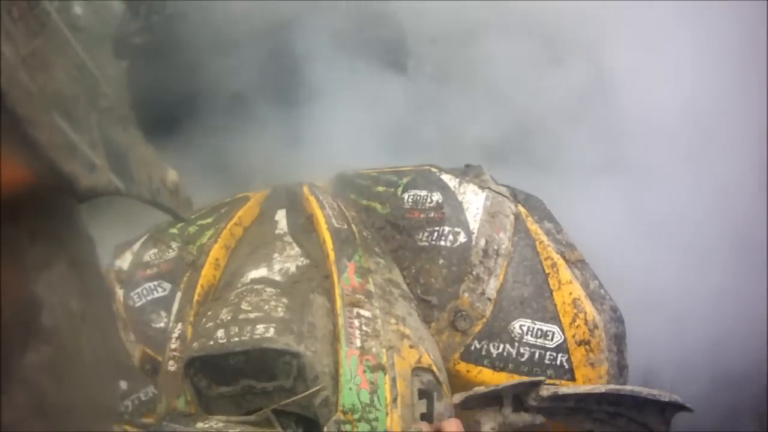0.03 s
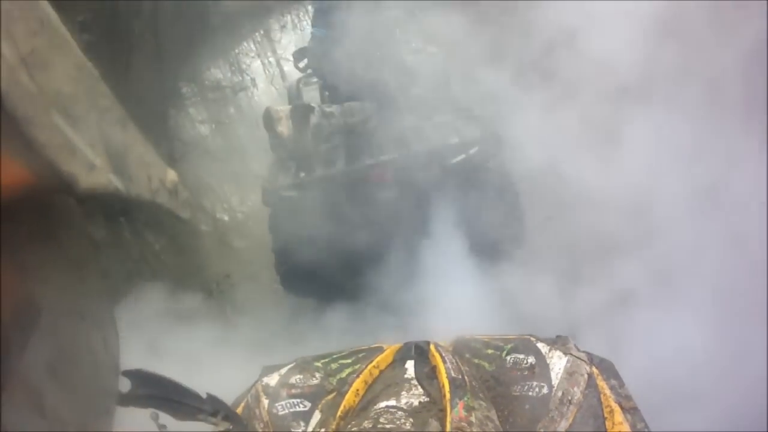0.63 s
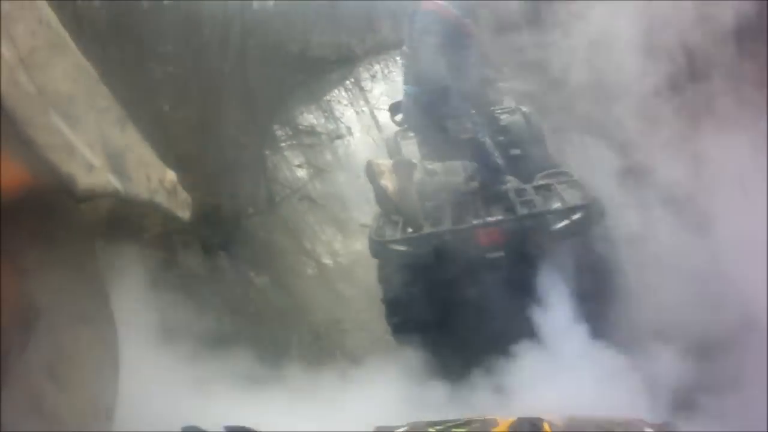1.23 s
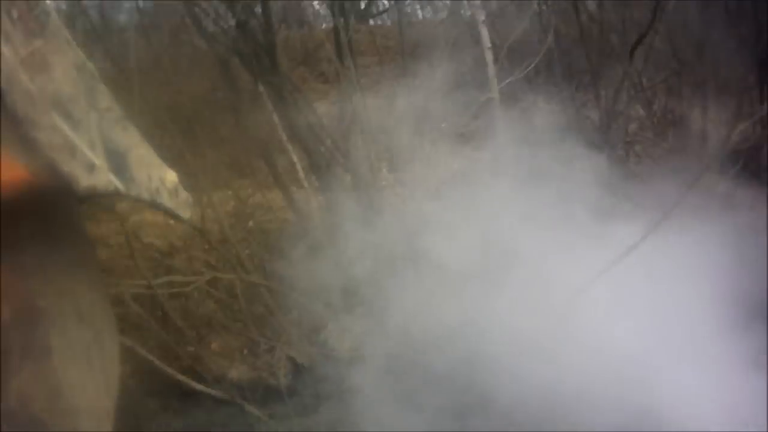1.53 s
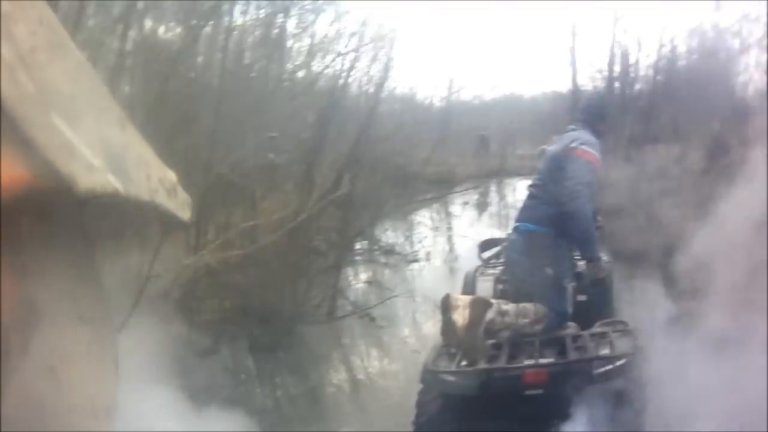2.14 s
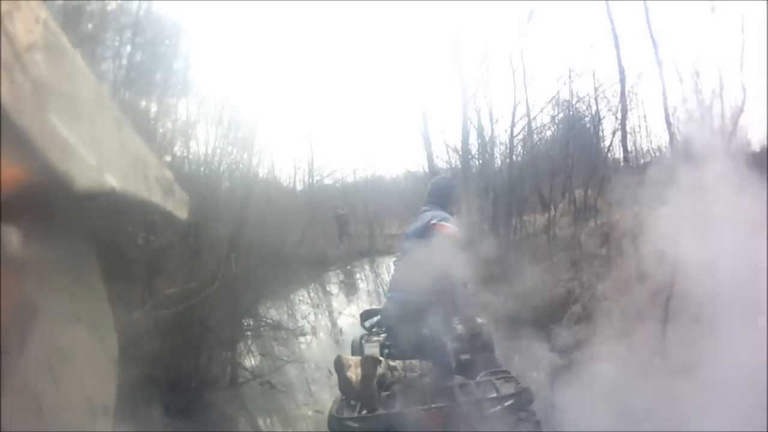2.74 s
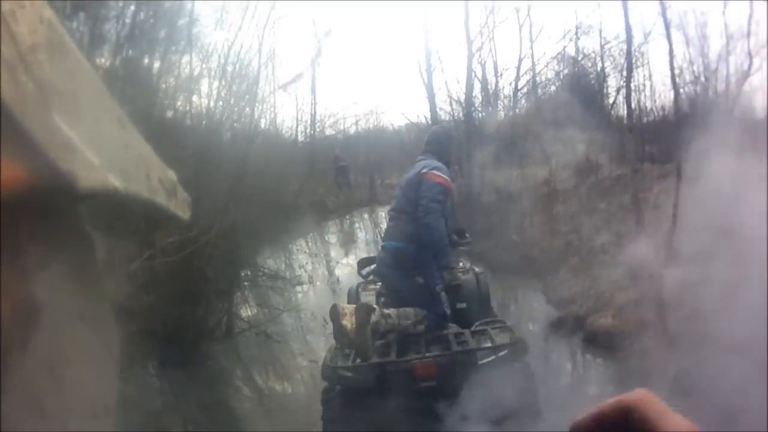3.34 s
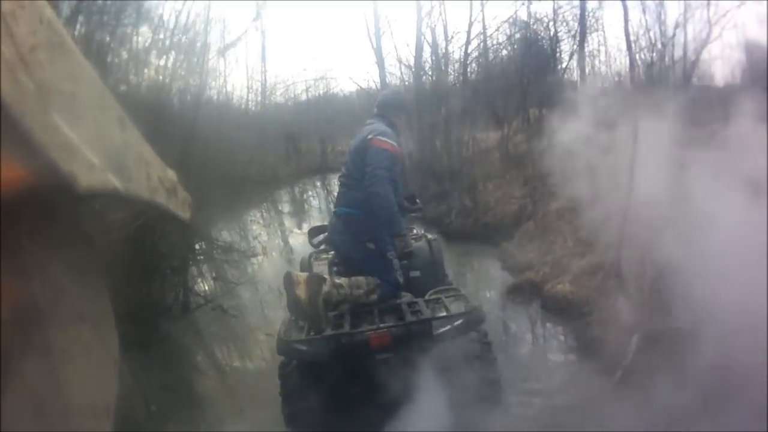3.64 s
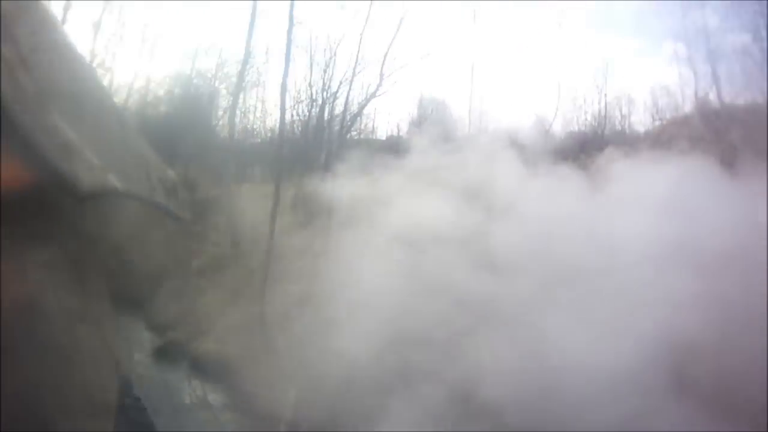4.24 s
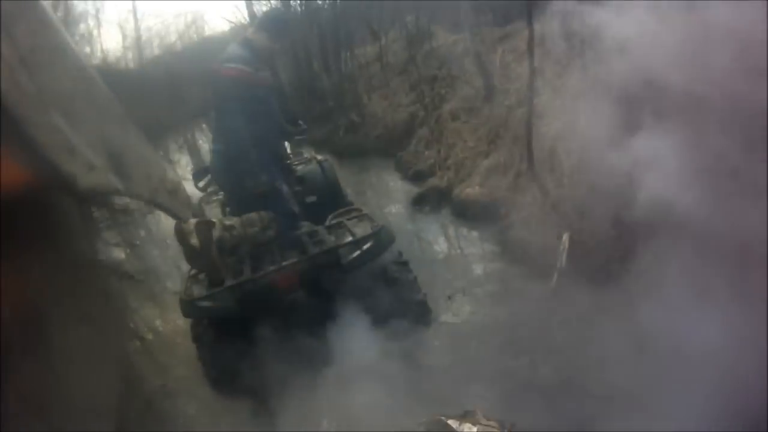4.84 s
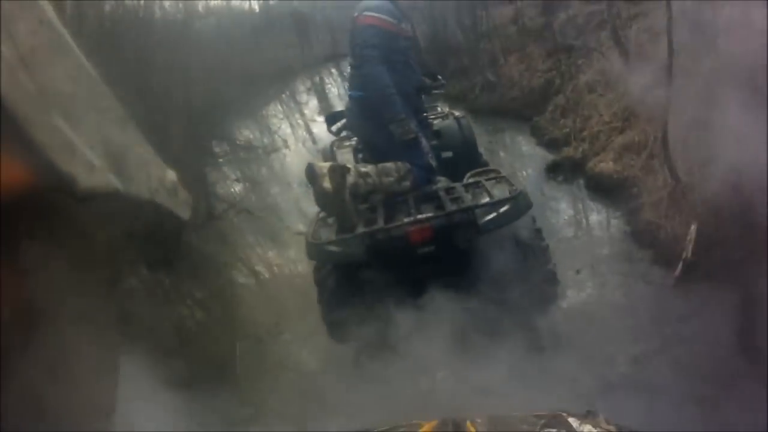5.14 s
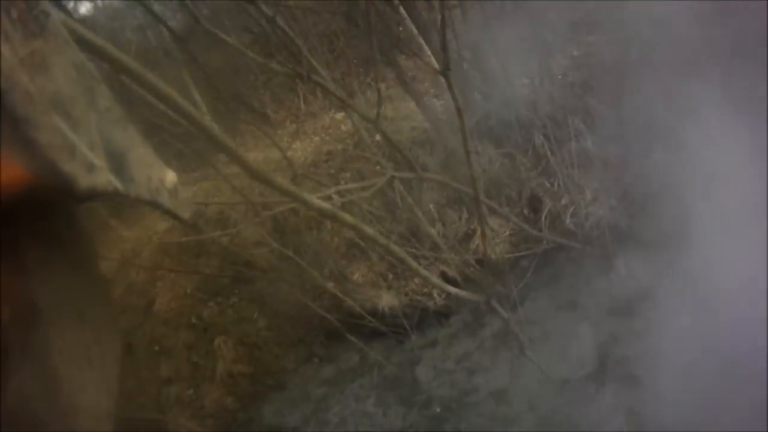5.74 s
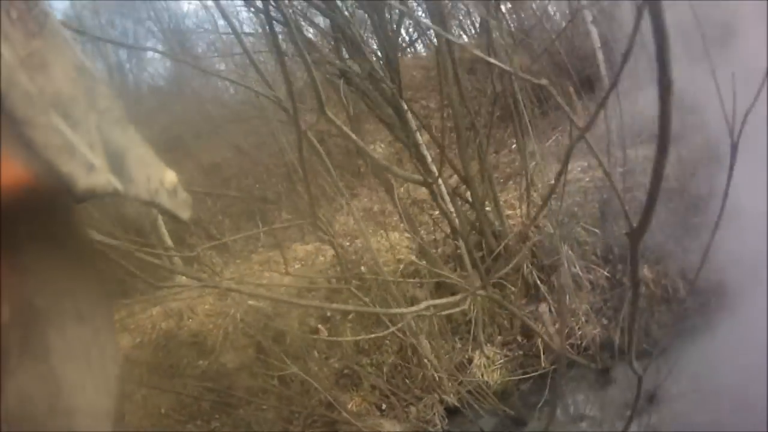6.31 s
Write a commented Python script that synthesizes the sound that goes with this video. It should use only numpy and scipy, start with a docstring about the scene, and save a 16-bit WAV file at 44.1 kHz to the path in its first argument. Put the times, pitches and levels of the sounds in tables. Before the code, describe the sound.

Outdoors in a muddy creek, water churns and sprays under the wheels while a quad bike's exhaust barks close in front. The engine breaks into harsh, choppy bursts at top revs, then the throttle shuts and the pitch sinks with backfires, hissing puffs and brief revs, down to a gentle putter. Underneath are the low hum of a second quad and occasional bumps on the microphone, which the loudest pops overload.

```python
"""Riding a quad bike through a muddy creek, close behind another, its tailpipe aimed at the microphone.
Wheels churn the water as the engine ahead barks under throttle, then stutters against the rev limiter.
From 1.3 s jolts thump the camera and the nearer quad's hum swells. After 2.3 s the engine ahead
backfires and coasts down, each turn puffing, hissing and ringing the pipe, between short throttle
blips and more backfires, to soft idle putts at 6 s. The loudest bangs overload the microphone."""
import sys
import numpy as np
from scipy import signal
from scipy.io import wavfile

SR = 44100
rng = np.random.default_rng(int(sys.argv[2]) if len(sys.argv) > 2 else 0)


def unload_audio(sound):
    """Save the sound as a 16-bit wav file, at the path given as the first command line argument."""
    columns = np.transpose(np.atleast_2d(sound))
    # keep every value between -1 and 1, then stretch to whole-number steps
    steps = np.round(np.clip(columns, -1, 1) * 32767)
    wavfile.write(sys.argv[1], SR, steps.astype(np.int16))


N = 280901
TIME = np.arange(N) / SR
LIMIT_RPS = 63  # crank speed at the rev limiter

# crank of the quad ahead, one exhaust puff a turn: t/s, speed/rps
CRANK_SPEED = [(0, 49.51), (.26, 51), (.524, 63.24), (.66, 64.9), (.88, 62.1), (1.15, 63.25),
               (2.346, 63.28), (2.737, 62), (2.946, 54.7), (3.116, 48.5), (3.501, 45), (3.679, 39.02),
               (3.97, 46.7), (4.03, 53.9), (4.08, 45.6), (4.463, 40.5), (4.754, 33.52), (5.136, 42.97),
               (5.389, 40), (5.78, 34.3), (5.82, 36.9), (6.37, 29.8)]
# every turn fires, barking under throttle or putting softly at idle:
# start/s, end/s, first level/dB, last level/dB, relative pipe boom/dB
FIRING_RUNS = [(0.005, 0.286, -20, -14, 1.5), (.28, 0.577, -14, -13.5, 0.5), (.888, 1.098, -8, -9, -5),
               (1.11, 1.205, -8.5, -10, -5), (2.555, 2.668, -18.5, -10, -11.5), (3.797, 4.02, -19, -8, -7),
               (4.805, 4.909, -26.5, -9, -8.5), (4.908, 4.96, -8, -13, -9.5), (4.99, 5.135, -8, -8.5, -9),
               (5.812, 5.885, -22.5, -9, -11), (5.984, 6.262, -27, -26, -12)]
# on the rev limiter: start/s, end/s, level/dB, relative pipe boom/dB
LIMITER_RUNS = [(.588, .70, -10.5, -4), (.73, .87, -7.5, -8), (1.221, 1.30, -6.5, -11.5),
                (1.347, 1.363, -4.5, -19), (1.395, 1.41, -7, -9), (1.442, 1.585, -5.5, -10),
                (1.615, 1.725, -5.5, -11), (1.757, 1.773, -6, -12), (1.805, 2.04, -5, -14.5),
                (2.057, 2.135, -5, -20), (2.167, 2.31, -6, -16)]
# the limiter lets the next turn fire too: t/s
AFTERFIRES_S = [1.308, 1.418, 1.592, 1.734, 2.049, 2.143]
# lone exhaust pops, backfires and one soft idle putt: t/s, level/dB, relative pipe boom/dB, length/s
SINGLE_BANGS = [(2.397, -9, -23, 0.0038), (2.444, -4.5, -12, 0.0079), (2.475, -11.5, -11, 0.0032),
                (2.524, -18, -16, 0.0069), (3.135, -7, -14, 0.006), (4.46, -12.5, -3.5, 0.013),
                (4.48, -21, -5, 0.0087), (5.221, -4.5, -10.5, 0.0086), (5.932, -3.5, -14.5, 0.0073),
                (6.175, -30, -15, 0.0019), (6.303, -13, -11.5, .006)]
# the tailpipe swings, favouring some resonances: t/s, swing/dB
PIPE_SWING = [(0, 4.5), (.45, -1), (1.1, -4.5), (1.4, 5), (1.95, 4.5), (2.4, -0.5), (2.95, -0.5),
              (3.25, -2), (3.7, -6.5), (3.9, 3), (4.3, 7), (4.75, -2), (6.37, 6.5)]
# resonances that follow the swing: f/Hz, share of swing
SWING_SHARES = [(185, 1.4), (535, 0.77), (1080, .7), (3100, 1.07), (4200, -1.05)]
# turbulent gas of a firing: f/Hz, width/Hz, level/dB
RASP_MODES = [(815, 290, -1.5), (1370, 156, -3), (1945, 193, 4), (2060, 197, 3), (2390, 290, 4.5),
              (2718, 293, 4.5), (3102, 323, 7), (3315, 270, 1), (3750, 460, -28), (4093, 570, 5),
              (4553, 206, 2), (5600, 480, -5), (6240, 420, 5), (6900, 460, 5.5), (7810, 770, 4),
              (8603, 170, -1.5)]
# pipe kicked by a firing: f/Hz, width/Hz, level/dB
FIRED_MODES = [(590, 83, -7.5), (856, 79, 5), (920, 23.5, 2), (1301, 25, -6), (1930, 360, -7.5),
               (3060, 87, -0.5)]
# hiss at the tailpipe: t/s, level/dB
HISS_LEVEL = [(0, -28.5), (1.2, -31.5), (2.6, -27), (3.15, -25), (3.7, -25.5), (3.9, -34.5), (4.3, -33.5),
              (4.85, -47), (5.25, -27), (5.6, -39), (6.3, -45)]
# soft puff: f/Hz, width/Hz, level/dB
PUFF_MODES = [(1890, 93, 5.5), (2117, 240, 1.5), (2375, 370, -0.5), (2714, 240, -3.5), (3050, 270, 1),
              (3310, 490, -14)]
# hissing jet: f/Hz, width/Hz, level/dB
JET_MODES = [(3830, 110, -19), (4157, 310, 1.5), (4600, 170, -5.5), (5730, 430, -4.5), (6410, 420, 2.5),
             (7050, 490, 3.5), (7346, 310, 6), (8090, 650, 1), (8860, 230, -4.5)]
# pipe kicked by each turn, fired or not: f/Hz, width/Hz, level/dB
TURN_MODES = [(576, 42, 2.5), (698, 32, 0.5), (848, 54, 4.5), (910, 26, -7), (1066, 14, 0.5), (1341, 19, 9),
              (1830, 140, -11), (3050, 370, 4)]
# churned water and spray: t/s, level/dB
CHURN_LEVEL = [(0, -23.5), (.6, -27), (2.25, -25), (2.7, -35), (2.93, -23), (3.15, -34), (3.9, -31),
               (4.6, -34.5), (5.3, -29.5), (6.2, -37)]
# splashing water: f/Hz, width/Hz, level/dB
WATER_MODES = [(302, 1040, -10), (826, 350, 2.5), (1447, 170, 4), (1922, 236, 9), (2216, 620, 6),
               (2940, 520, 6), (4310, 1100, 2), (6530, 1640, 0), (8160, 1900, 0)]
# exhaust drone: f/Hz, width/Hz, level/dB
DRONE_MODES = [(99, 62, 14), (150, 30, -3.5), (232, 43, -8), (402, 310, -33)]
# camera jolts: t/s, thump/dB, scuff/dB, decay/s
CAMERA_JOLTS = [(1.336, -39, -24.5, .057), (2.316, -18.5, -16.5, 0.0055), (2.35, -41, -48, .05),
                (2.499, -35, -55, .04), (2.572, -35, -27.5, 0.076), (3.06, -38, -34, 0.075),
                (5.402, -28, -22, 0.016), (5.454, -25, -26, 0.013), (6.335, -58, -25, 0.089)]
# camera mount: f/Hz, width/Hz, level/dB
THUMP_MODES = [(48.6, 5.5, -1), (60, 127, -9)]
SCUFF_MODES = [(130, 156, -2.0), (312, 830, -8.5), (696, 460, 2)]
# hum of the nearer quad: t/s, f/Hz, level/dB
HUM_CURVE = [(0, 112.4, -70), (1.5, 114, -37.5), (2.3, 110.6, -68), (3.0, 103.4, -51), (4.5, 105.6, -59),
             (4.75, 106, -40.5), (4.95, 118.5, -41.5), (5.3, 118.4, -40), (5.6, 113.7, -44),
             (6.0, 108.3, -43.5), (6.1, 117.8, -45.5), (6.37, 112.3, -47)]
# its harmonics: multiple, level/dB
HUM_HARMONICS = [(1, 4.5), (2, -14), (3, -3), (4, -8.5)]
# low pipe tones, throttle shut: f/Hz, width/Hz, level/dB
OVERRUN_MODES = [(186, 43, -6.5), (530, 36.4, 3.5), (819, 40, -6), (1080, 36, 0.5)]
# brief drops of puffs, water and low tones: t/s, depth/dB, recovery/s
LEVEL_DIPS = [(2.312, -26, 0.091), (2.487, -12, 0.044), (2.969, -15, 0.01)]
# narrow bands missing from the sound ahead: f/Hz, width/Hz
CANCELLED_BANDS = [(1590, 102), (3520, 90), (5150, 220)]


def from_db(db):
    """Level to amplitude."""
    return 10 ** (np.asarray(db) / 20)


def rms_one(x):
    """Scale to unit RMS."""
    return x / np.sqrt(np.mean(x ** 2) + 1e-20)


def in_time(rows):
    """Columns of a curve at every sample."""
    t_s, *columns = np.transpose(rows)
    return [np.interp(TIME, t_s, column) for column in columns]


def cut(x, hz, kind, order=2):
    """Butterworth low- or high-pass."""
    return signal.sosfilt(signal.butter(order, hz, kind, fs=SR, output="sos"), x + 1e-18)


def resonate(x, hz, width_hz):
    """One resonance, peak gain 1."""
    r = np.exp(-np.pi * width_hz / SR)
    feedback = [1, -2 * r * np.cos(2 * np.pi * hz / SR), r * r]
    return signal.lfilter(np.array([1, 0, -1]) * (1 - r * r) / 2, feedback, x + 1e-18)


def body(x, modes, aimed=False, order=1):
    """Parallel resonances, power-normalised; order 2 deepens the valleys; aimed ones follow the swing."""
    swings_db = {hz: share * in_time(PIPE_SWING)[0] for hz, share in SWING_SHARES} if aimed else {}
    out, power = 0, 0
    for hz, width_hz, db in modes:
        swing_db = sum(curve for centre_hz, curve in swings_db.items() if abs(hz / centre_hz - 1) < .085)
        mode = x
        for _ in range(order):
            mode = resonate(mode, hz, width_hz)
        out = out + from_db(db + swing_db) * mode
        power += from_db(db) ** 2 * np.pi * width_hz / SR / order
    return out / np.sqrt(power)


def drift(rate_hz):
    """Random curve through unit-variance knots."""
    knots = rng.standard_normal(int(rate_hz * N / SR) + 2)
    return np.interp(TIME * rate_hz, np.arange(len(knots)), knots)


def add(track, t_s, piece):
    """Mix a piece into a track."""
    i = max(int(t_s * SR), 0)
    track[i:i + len(piece)] += piece[:max(N - i, 0)]


def blasts(rows, rise_s, fall_s):
    """Turbulent gas (t/s, level/dB, length/s): swells, holds while the cylinder empties, dies."""
    flow, t = np.zeros(N), TIME[:SR // 20]
    for t_s, db, length_s in rows:
        swell = 1 - np.exp(-t / rise_s)
        decay = np.exp(-np.maximum(t - length_s, 0) / fall_s)
        add(flow, t_s, from_db(db) * swell * decay)
    return flow * rng.standard_normal(N)


def kicks(times_s, db):
    """One pressure impulse at each time."""
    out = np.zeros(N)
    out[np.clip((times_s * SR).astype(int), 0, N - 1)] = from_db(db)
    return out


def between(turns_s, start_s, end_s):
    """Turns within a time span."""
    return turns_s[(turns_s > start_s) & (turns_s <= end_s)]


def port_openings(start_turn=.284):
    """Times at which the crank completes a turn."""
    turn_count = np.cumsum(in_time(CRANK_SPEED)[0]) / SR + start_turn
    return TIME[1:][np.diff(np.floor(turn_count)) > 0]


def firings(turns_s, lead_s=.0008, uneven_db=1.65, burn_s=.005, bang_s=.0053, after_db=-11):
    """Runs fire every turn, on the limiter every second turn; plus single bangs and afterfires."""
    sparks_s = turns_s - lead_s
    rows = list(SINGLE_BANGS) + [(t_s, after_db, after_db, burn_s) for t_s in AFTERFIRES_S]
    for start_s, end_s, first_db, last_db, boom_db in FIRING_RUNS:
        for t_s in between(sparks_s, start_s, end_s):
            rows.append((t_s, np.interp(t_s, [start_s, end_s], [first_db, last_db]), boom_db, burn_s))
    for start_s, end_s, db, boom_db in LIMITER_RUNS:
        rows += [(t_s, db, boom_db, bang_s) for t_s in between(sparks_s, start_s, end_s)[::2]]
    t_s, db, boom_db, length_s = np.transpose(rows)
    return t_s, db + uneven_db * np.interp(t_s, TIME, drift(LIMIT_RPS)), boom_db, length_s


def bark(turns_s, ring_db=24.5, snap_db=-5.0, snap_s=.0026, crack_db=-30.0):
    """A firing snaps out of the tailpipe, kicks it into ringing and ends in turbulence."""
    t_s, db, boom_db, length_s = firings(turns_s)
    gas = blasts(np.c_[t_s, db, length_s], rise_s=.00012, fall_s=.0028)
    fronts = np.c_[t_s + .0006, db + snap_db, np.full(len(t_s), snap_s)]
    snap = blasts(fronts, rise_s=.00015, fall_s=.0024)
    rasp = body(gas, RASP_MODES, aimed=True, order=2) + cut(snap, 2440, "high")
    rasp = cut(cut(rasp, 9940, "low", order=8), 450, "high")
    ring = body(kicks(t_s + .0005, db + boom_db + ring_db), FIRED_MODES, aimed=True)
    ring = cut(cut(ring, 445, "high", order=6), 4300, "low")
    return rasp + ring + from_db(crack_db) * gas


def pumping(turns_s, hiss_gain_db=8.0, kick_db=14.5, spread_db=1.05):
    """Fired or not, each turn puffs, hisses and rings the pipe; the gas rebounds half a turn later."""
    speed_rps = np.interp(turns_s, TIME, in_time(CRANK_SPEED)[0])
    hiss_db = np.interp(turns_s, TIME, in_time(HISS_LEVEL)[0]) + hiss_gain_db
    uneven_db = spread_db * rng.standard_normal(len(turns_s))
    sag_rps = LIMIT_RPS - speed_rps
    puff_db = -28.5 - .1 * sag_rps
    ring_db = 1.0 - .82 * sag_rps
    rebound_db = -5.0 - .1 * sag_rps
    sizzle_db = -12.0 - 5.0 * np.interp(TIME, turns_s, np.maximum(sag_rps, 0))

    def flow(db, length_s):
        lengths_s = np.full(len(turns_s), length_s)
        outflow = np.c_[turns_s, db + uneven_db, lengths_s]
        rebound = np.c_[turns_s + .5 / speed_rps, db + uneven_db + rebound_db, lengths_s / 2]
        return blasts(np.vstack([outflow, rebound]), rise_s=.0007, fall_s=.0039)

    pulses = flow(puff_db, length_s=.0038) + kicks(turns_s, puff_db + kick_db)
    puffs = body(pulses, PUFF_MODES, aimed=True, order=2)
    gas = flow(hiss_db, length_s=.0013)
    jet = body(gas, JET_MODES, aimed=True, order=2)
    sizzle = from_db(sizzle_db) * cut(gas, 7400, "high")
    ring = body(kicks(turns_s, ring_db + uneven_db / 2), TURN_MODES, aimed=True)
    ring = cut(cut(ring, 296, "high", order=4), 2030, "low")
    return puffs + jet + sizzle + ring


def churn(lump_db=3.5, spray_db=-21.0):
    """Wheels thrash the water: a lumpy rush under fine spray."""
    splashes = rng.standard_normal(N) * from_db(lump_db * drift(220))
    rush = cut(body(splashes, WATER_MODES, order=2), 7860, "low", order=8)
    spray = from_db(spray_db) * splashes
    return from_db(in_time(CHURN_LEVEL)[0]) * rms_one(rush + spray)


def drone(turns_s, level_db=-51.5, uneven_db=1.0):
    """Low orders of the exhaust pulses."""
    pulses = body(kicks(turns_s, rng.normal(0, uneven_db, len(turns_s))), DRONE_MODES)
    return from_db(level_db) * rms_one(cut(cut(pulses, 50, "high"), 840, "low"))


def jolts(rumble_db=-51.5):
    """The camera mount thumps and scuffs at each jolt, and rumbles in between."""
    thump_gain, scuff_gain = np.zeros(N), np.zeros(N)
    for t_s, thump_db, scuff_db, decay_s in CAMERA_JOLTS:
        decay = np.exp(-TIME[:SR // 3] / decay_s)
        add(thump_gain, t_s, from_db(thump_db) * decay)
        add(scuff_gain, t_s, from_db(scuff_db) * decay)
    thump = body(rng.standard_normal(N) * (thump_gain + from_db(rumble_db)), THUMP_MODES)
    scuff = body(rng.standard_normal(N) * scuff_gain, SCUFF_MODES)
    return cut(thump, 170, "low") + cut(scuff, 610, "low")


def near_quad(gain_db=-3.0, waver=.0031, flutter_db=.95):
    """Muffled engine hum: wavering harmonics that swell and fade."""
    hz, db = in_time(HUM_CURVE)
    phase = 2 * np.pi * np.cumsum(hz * (1 + waver * drift(25.73))) / SR
    hum = sum(from_db(level_db) * np.sin(k * phase) for k, level_db in HUM_HARMONICS)
    return from_db(db + gain_db + flutter_db * drift(15)) * rms_one(hum)


def overrun(turns_s, top_db=-3, sag_db_per_rps=.81, swell_s=.046):
    """Away from any firing the turns are alike and ring the pipe in clean low harmonics."""
    fired_s = firings(turns_s)[0]
    gap_s = np.abs(turns_s[:, None] - fired_s).min(axis=1)
    shut = 1 - np.exp(-gap_s / swell_s)
    sag_rps = LIMIT_RPS - np.interp(turns_s, TIME, in_time(CRANK_SPEED)[0])
    pulses = kicks(turns_s, top_db - sag_db_per_rps * sag_rps) * np.interp(TIME, turns_s, shut)
    ring = body(pulses, OVERRUN_MODES, aimed=True, order=2)
    return cut(cut(ring, 164, "high"), 1340, "low")


def dips():
    """Gain that drops suddenly, then recovers."""
    return from_db(sum(depth_db * (TIME > t_s) * np.exp(-np.abs(TIME - t_s) / recovery_s)
                       for t_s, depth_db, recovery_s in LEVEL_DIPS))


def creek(x, echo_db=-19.5, echo_s=.0108, tail_db=-18.5, t60_s=.086):
    """Near reflection off the water, scatter from banks and trees."""
    t = TIME[:SR // 3]
    scatter = cut(rng.standard_normal(len(t)), 4150, "low") * from_db(-60 * t / t60_s) * (t > .006)
    tail = signal.fftconvolve(x, scatter / np.linalg.norm(scatter))[:N]
    echo = np.interp(TIME - echo_s, TIME, x, left=0)
    return x + from_db(echo_db) * echo + from_db(tail_db) * tail


def hollow(x):
    """A few narrow bands are notched out."""
    for hz, width_hz in CANCELLED_BANDS:
        x = signal.lfilter(*signal.iirnotch(hz, hz / width_hz, fs=SR), x)
    return x


def scene():
    """Exhaust and water ahead; nearer quad and jolts at the camera."""
    turns_s, dip = port_openings(), dips()
    exhaust = creek(bark(turns_s) + dip * pumping(turns_s))
    ahead = hollow(exhaust + dip * (churn() + overrun(turns_s)))
    return (ahead + drone(turns_s) + near_quad() + jolts())[None]


def record(dry, ceiling=.39, cutoff_hz=15600):
    """Bangs overload the microphone: soft clip, then steep low-pass."""
    clipped = dry / (1 + (dry / ceiling) ** 4) ** (1 / 4)
    return signal.sosfilt(signal.ellip(10, .2, 80, cutoff_hz, fs=SR, output="sos"), clipped)


dry = scene()
out = record(dry)
unload_audio(out)
```